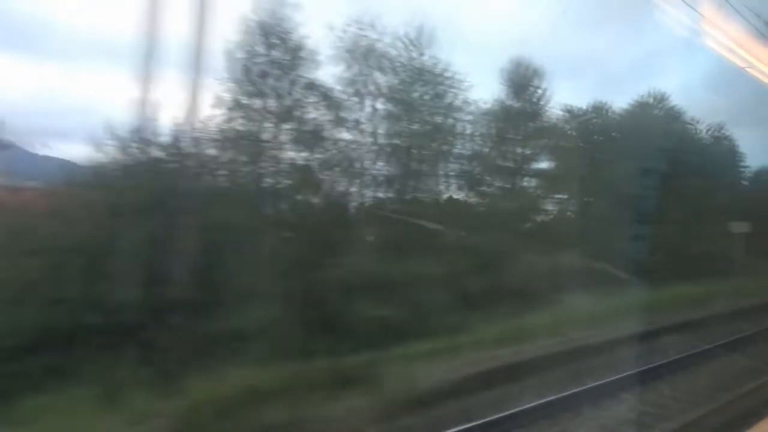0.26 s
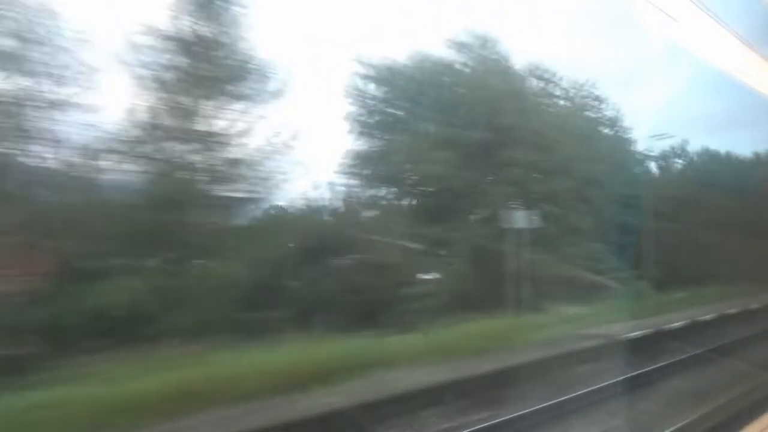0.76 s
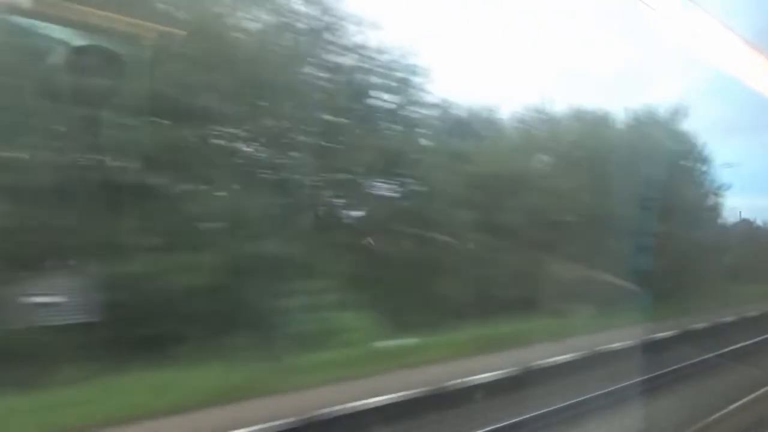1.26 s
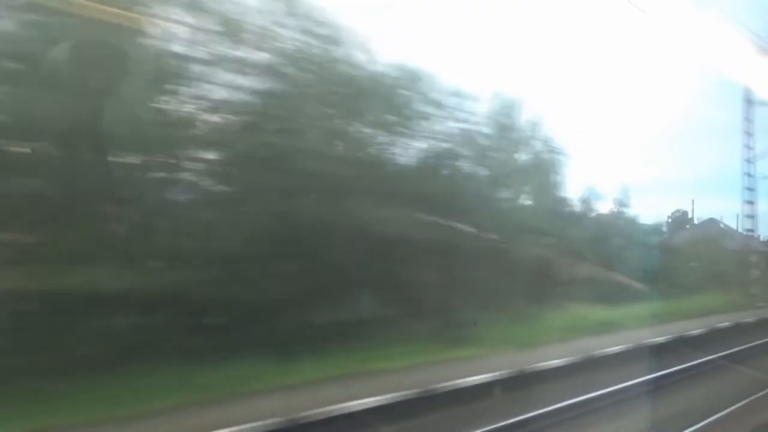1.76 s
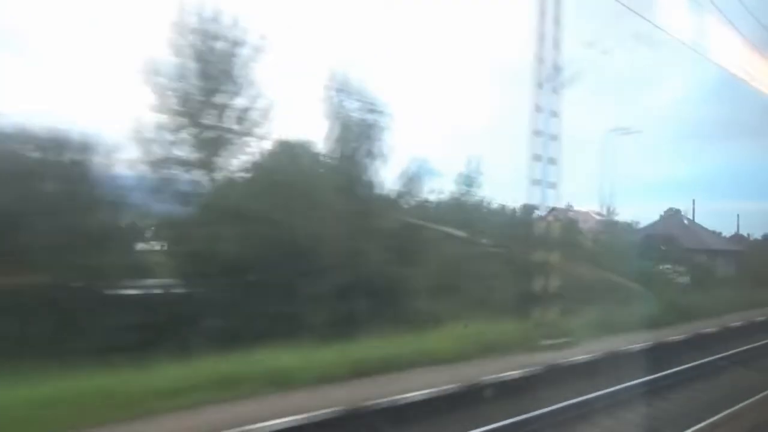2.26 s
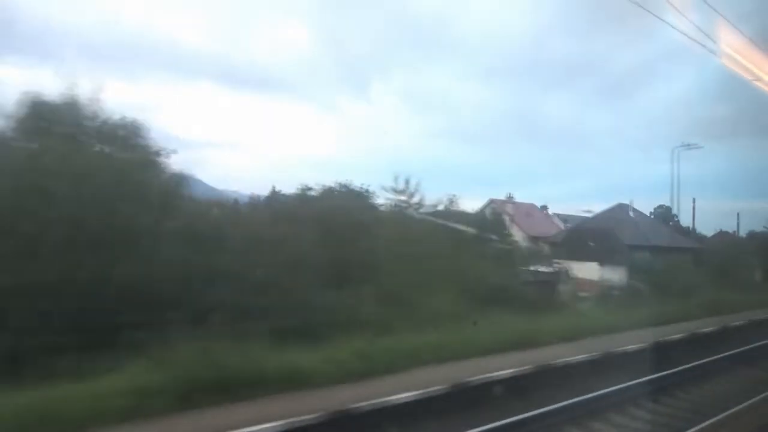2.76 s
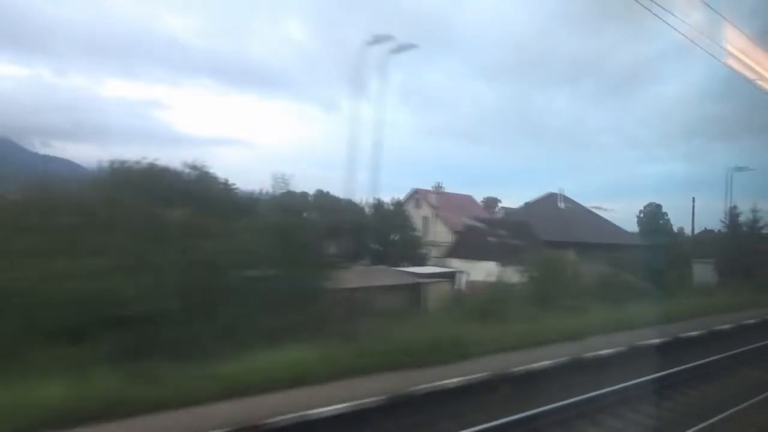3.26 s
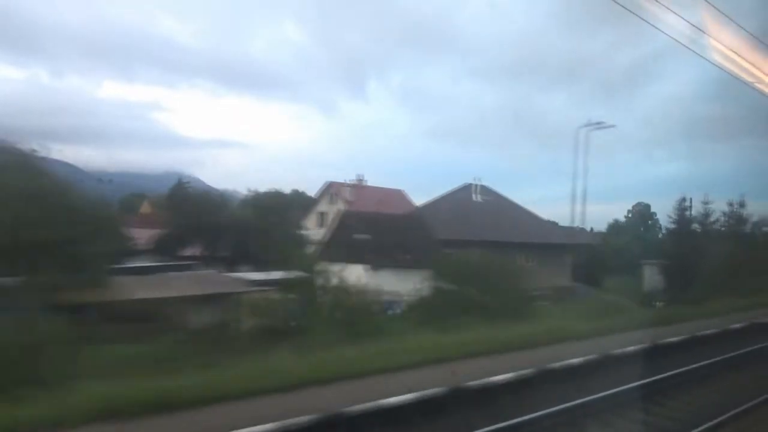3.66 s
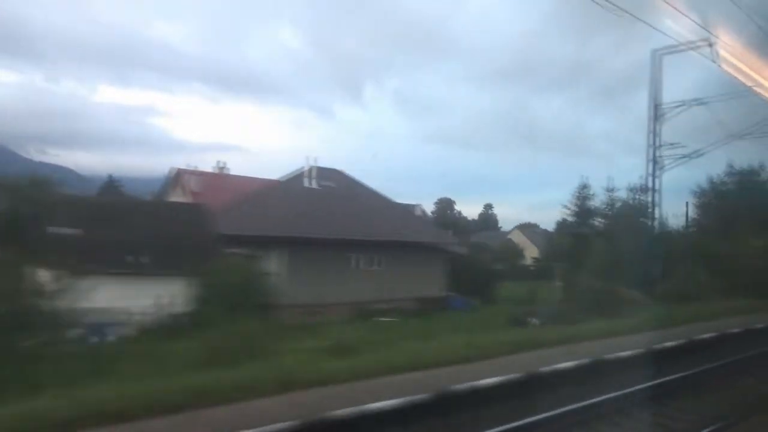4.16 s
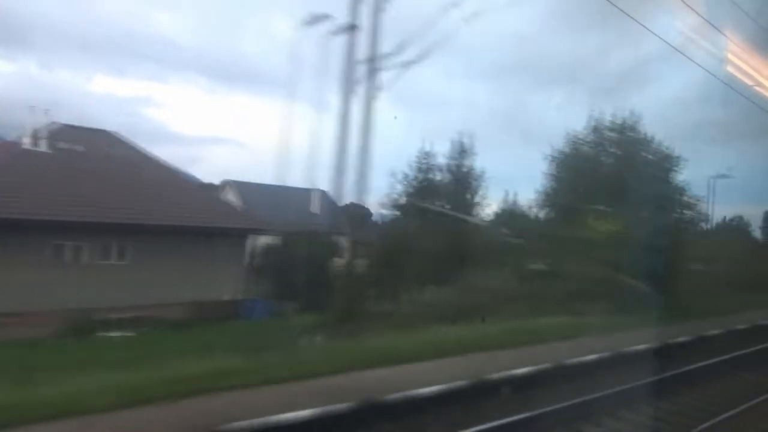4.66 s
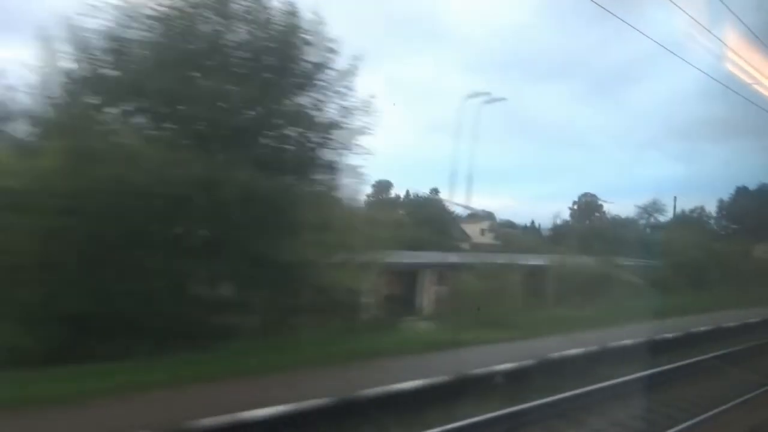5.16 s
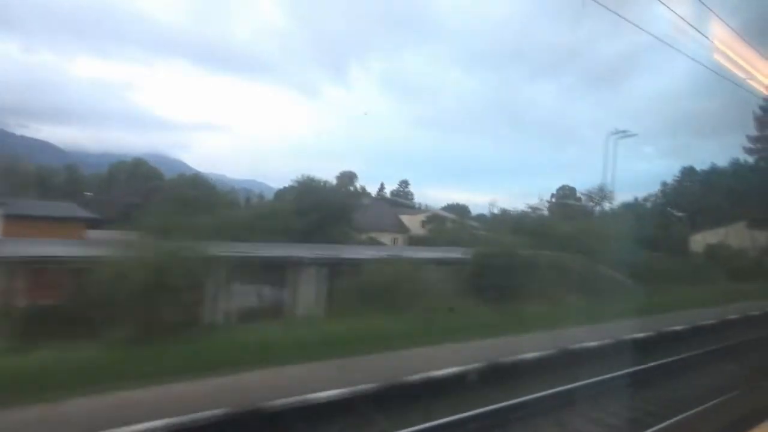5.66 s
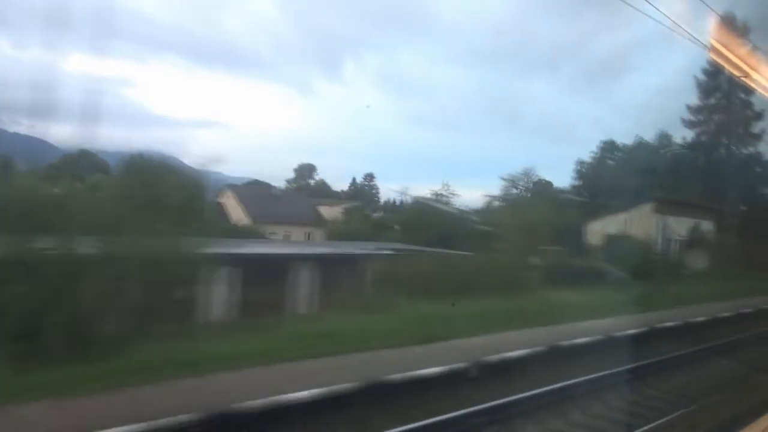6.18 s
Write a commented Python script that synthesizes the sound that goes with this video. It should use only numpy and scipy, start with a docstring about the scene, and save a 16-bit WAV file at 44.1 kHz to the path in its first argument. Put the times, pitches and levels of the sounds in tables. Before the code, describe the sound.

Inside a passenger train at speed, the wheels make a steady low rumble and roar on the rails, with a gently pulsing gear whine and a faint hiss of air. A dull wheel knock comes about a second in, and a quick run of knocks around three seconds, both with small metallic pings. Loose trim buzzes and ticks lightly on and off. The microphone is close, inside the carriage.

```python
"""Rolling noise inside a passenger carriage at speed: wheel and rail roughness comes up through the floor
and fills the modes of the car body, and the wheels knock over rough spots. Two gear drives whine a hair
apart and beat. Loose trim buzzes in spells and ticks; now and then a metal fitting pings. Air hisses past
window and vents. Heard by a close pair of microphone ports whose bass differs in level and phase."""
import sys
import numpy as np
from scipy import signal
from scipy.fft import rfft, irfft
from scipy.io import wavfile
from scipy.ndimage import uniform_filter1d, minimum_filter1d

SR = 44100
rng = np.random.default_rng(int(sys.argv[2]) if len(sys.argv) > 2 else 0)


def master(y):
    """Save y as 16-bit WAV."""
    cut = np.clip(np.atleast_2d(y).T, -1, 1)
    pcm = np.round(cut * 32767)  # scale
    wavfile.write(sys.argv[1], SR, pcm.astype(np.int16))


N = 283122
TIME_S = np.arange(N) / SR
HZ = np.maximum(np.arange(N // 2 + 1) * SR / N, 1)

# Each row: time in seconds, sway level in dB, floor boom level in dB.
BODY_LEVELS = [(0.0, -36, -24), (0.18, -41, -20.5), (0.36, -30.5, -30), (0.46, -50, -19),
               (0.53, -21, -22.5), (0.95, -42, -16), (1.03, -41, -33), (1.11, -35, -17.5),
               (1.59, -35, -26.5), (1.88, -25, -23.5), (1.93, -49.5, -22), (2.13, -50, -23),
               (2.22, -24, -41), (2.31, -40, -22.5), (2.47, -38, -29), (2.54, -24, -15),
               (2.61, -31.5, -27.5), (2.68, -22, -19), (2.76, -30, -24.5), (3.34, -41.5, -14.5),
               (3.48, -35, -19.5), (3.54, -47.5, -27.5), (3.83, -31, -22), (3.88, -33, -21),
               (4.7, -27, -25), (4.83, -42, -14), (4.9, -47, -28.5), (5.06, -23, -19), (5.33, -47, -18.5),
               (5.36, -39, -27), (5.78, -44, -17.5), (5.93, -27, -29), (6.26, -39, -20.5),
               (6.42, -60, -22.5)]
# Each row: time in seconds, level of the second floor mode in dB.
THRUM_LEVELS = [(0.0, -25), (0.07, -22.5), (0.18, -26), (0.93, -25), (0.95, -34.5), (1.14, -17),
                (1.41, -27), (2.32, -29.5), (2.5, -18), (3.0, -37.5), (3.07, -28.5), (3.57, -31),
                (3.68, -22), (4.17, -25), (4.38, -18.5), (4.43, -32), (4.52, -16), (4.58, -26.5),
                (4.67, -18), (4.74, -33), (4.79, -19.5), (4.86, -39), (4.95, -25.5), (6.22, -25.5),
                (6.33, -17.5), (6.42, -35)]
# Each row: frequency in Hz, relative density in dB.
SWAY_SPECTRUM = [(15, -41), (25, -26), (35, -14.5), (48, -17), (60, -25), (90, -40)]
# Floor modes. Each row: frequency in Hz, width in Hz, relative level in dB.
BOOM_MODES = [(60.9, 18.7, -2), (79, 59, -27)]
THRUM_MODES = [(103.5, 13.6, 0)]


def car_body():
    """Wheel and rail roughness sways the body and drives the floor modes; each part swells on its own."""
    sway_db, boom_db = in_time(BODY_LEVELS)
    thrum_db, = in_time(THRUM_LEVELS)
    sway = amp(sway_db) * steadied(noise(colour(SWAY_SPECTRUM)), window_s=0.25)
    boom = amp(boom_db) * steadied(noise(modal(BOOM_MODES)), window_s=0.073)
    thrum = amp(thrum_db) * steadied(noise(modal(THRUM_MODES)), window_s=0.08)
    return sway + boom + thrum


# Each row: time in seconds, bogie rumble level in dB, roar level in dB before its lift.
TRACK_LEVELS = [(0.0, -19.5, -40), (0.3, -22.5, -39.5), (0.7, -20, -40.5), (1.15, -21.5, -40.5),
                (1.5, -22, -39), (1.8, -20.5, -38.5), (2.3, -21.5, -39), (2.55, -21, -38),
                (2.95, -20.5, -39), (3.2, -16, -39.5), (3.5, -22.5, -39.5), (3.85, -21, -40),
                (4.5, -21, -39), (5.0, -20.5, -39.5), (5.2, -20.5, -39.5), (5.5, -21, -39.5),
                (6.42, -20, -38.5)]
# Random swells and dips of the 400-480 Hz drone noise. Each row: time in seconds, level in dB.
DRONE_SWELLS = [(0.0, -17.5), (0.27, -28.5), (0.3, -23), (1.52, -21), (1.55, -33.5), (1.63, -16),
                (1.64, -27.5), (1.79, -24), (1.82, -17.5), (1.91, -24.5), (1.97, -19), (2.25, -25),
                (2.95, -21.5), (3.5, -26.5), (3.54, -17), (3.65, -26), (3.68, -23.5), (3.97, -24.5),
                (4.0, -17), (4.04, -28), (4.11, -19.5), (4.17, -30), (4.29, -19), (4.54, -25), (5.47, -21),
                (5.52, -29.5), (5.58, -21), (5.92, -23), (6.24, -18.5), (6.42, -28)]
# Each row: frequency in Hz, width in Hz, relative level in dB.
RUMBLE_MODES = [(119, 15.5, -3.5), (149.6, 32.7, -1.5), (186, 108, -7), (227.4, 34, -5.5), (280, 27, -13.5),
                (307.5, 41, -10.5), (354, 73, -11.5)]
DRONE_MODES = [(409.6, 21.7, -4), (436.4, 19, -1), (457.3, 23.7, -2), (476, 28, -8)]
# Each row: frequency in Hz, relative density in dB.
FILL_SPECTRUM = [(40, -23), (70, 2.5), (130, -4.5), (250, -7.5), (380, -10), (480, -21), (600, -59)]
ROAR_SPECTRUM = [(300, -10), (500, -1), (575, -7), (632, -5.5), (740, -9), (873, -13), (1290, -15.5),
                 (1560, -21.5), (1840, -25.5), (2160, -24.5), (2900, -31.5), (4000, -42), (5200, -52)]


def rolling(fill_db=-29.5, roar_lift_db=9.5):
    """Roughness shakes the bogie in its modes, over a wavering drone and a broad roar."""
    rumble_db, roar_db = in_time(TRACK_LEVELS)
    swell_db, = in_time(DRONE_SWELLS)
    rumble = amp(rumble_db) * steadied(noise(modal(RUMBLE_MODES)), window_s=0.19)
    drone = amp(swell_db) * steadied(noise(modal(DRONE_MODES)), window_s=0.2)
    fill = amp(fill_db) * noise(colour(FILL_SPECTRUM))   # between the modes
    roar = amp(roar_db + roar_lift_db) * noise(colour(ROAR_SPECTRUM))
    return rumble + drone + fill + roar


# Each row: start in seconds, level in dB.
KNOCKS = [(1.09, -25), (3.035, -19.5), (3.1, -20.5), (3.16, -22), (3.195, -18), (3.212, -23.5),
          (3.245, -27), (3.285, -24.5), (3.32, -34)]
# Each row: frequency in Hz, relative density in dB.
KNOCK_SPECTRUM = [(80, -29), (150, -8.5), (220, 0.5), (300, 0), (420, -5), (650, -11.5), (900, -19),
                  (1400, -29), (2100, -31.5), (3000, -37.5), (4500, -55)]


def wheel_knocks():
    """Wheels hit rough spots in the rail: dull bursts of noise."""
    return blows(KNOCKS, rise_s=0.0062, t60_s=0.27) * noise(colour(KNOCK_SPECTRUM))


# Each row: time in seconds, tooth-mesh level in dB.
MESH_LEVELS = [(0, -36), (.45, -41.5), (.9, -38.5), (1.3, -38.5), (1.8, -36.5), (2.2, -36.5), (2.6, -36.5),
               (3.1, -38), (3.5, -40.5), (3.95, -39), (4.4, -38.5), (4.8, -39), (5.2, -39), (5.6, -38),
               (6.0, -39), (6.42, -34.5)]
# Slip between the drives. Each row: time in seconds, beat rate in Hz.
BEAT_RATES = [(0, 1.1), (2.9, 1.1), (3.2, 1.2), (6.42, 1.2)]
# Each row: frequency in Hz, level in dB.
WHINES = [(1578, -64), (1639, -66), (2422, -63), (4601, -78), (4856, -74), (5186, -77), (5600, -79),
          (5900, -74), (5798, -76), (7285, -80), (9200, -82), (9399, -80)]


def gear_drives(mesh_hz=789.02, first_db=0.5, second_db=-4, start_cycles=0.072):
    """Two nearly equal tooth-mesh tones beat; faint steady whines lie above."""
    mesh_db, = in_time(MESH_LEVELS)
    beat_hz, = in_time(BEAT_RATES)
    slip_cycles = start_cycles + np.cumsum(beat_hz) / SR
    first = amp(first_db) * np.cos(2 * np.pi * mesh_hz * TIME_S)
    second = amp(second_db) * np.cos(2 * np.pi * (mesh_hz * TIME_S + slip_cycles))
    whines = sum(amp(db) * np.sin(2 * np.pi * hz * TIME_S) for hz, db in WHINES)
    return np.sqrt(2) * (amp(mesh_db) * (first + second) + whines)


# Each row: start in seconds, level in dB.
PINGS = [(1.081, -32), (1.101, -27), (1.123, -37), (1.222, -32), (1.257, -32), (1.298, -36), (3.104, -38),
         (3.116, -38), (3.13, -36), (3.146, -25.5), (3.175, -35), (3.186, -33), (3.193, -33), (3.203, -29),
         (3.24, -37), (3.33, -36)]
# Each row: frequency in Hz, relative level in dB, delay in seconds.
FITTING_MODES = [(2115, 1, .006), (2330, -16, .003), (2560, -8, 0.0024), (2890, -12, 0.0035),
                 (3240, -16, 0.0039)]


def fitting_pings(rise_s=0.004, t60_s=0.035, detune=0.01, scatter_db=2.0):
    """A jolted metal fitting rings in its modes, the lowest last; pitch and level vary by blow."""
    out, t = np.zeros(N), np.arange(SR // 4) / SR
    attack = np.minimum(t / rise_s, 1)
    for start_s, ping_db in PINGS:
        for hz, mode_db, delay_s in FITTING_MODES:
            db = ping_db + mode_db + rng.normal(0, scatter_db)
            ring = np.sin(2 * np.pi * hz * rng.normal(1, detune) * t)
            at = round((start_s + delay_s) * SR)
            out[at:at + len(t)] += attack * amp(db - 60 * t / t60_s) * ring
    return out


# Each row: start in seconds, length before the fall in seconds, level in dB, brightness in dB.
BUZZ_SPELLS = [(.13, 0.13, -59, -5), (.69, 0.082, -52.5, 11), (0.858, 0.12, -62, 3), (1.08, .04, -52, 3),
               (1.135, 0.082, -51, -1), (1.41, 0.05, -52, -1), (1.525, .04, -62, -3),
               (2.99, 0.22, -53.5, 3), (3.136, 0.15, -53, -1), (3.285, 0.15, -50.5, 9),
               (3.46, 0.073, -50, 4), (3.823, 0.088, -51.5, 8), (4.82, 0.051, -51.5, 0),
               (5.03, .06, -55, 6), (5.142, 0.23, -51, 11), (5.65, 0.13, -52.5, 6), (5.8, 0.21, -56.5, 7),
               (6.084, 0.14, -49.5, 7), (6.325, 0.079, -49.5, 5)]
# Panel motions that close the gap. Each row: frequency in Hz, width in Hz, relative level in dB.
PANEL_MODES = [(58.8, 4.6, -2.5), (53, 4.4, -1.5)]


def buzz_force(rest_db=-58, rise_s=0.035, fall_s=0.04, settle_s=0.0091):
    """Trim presses on its frame in spells, harder at each outward swing. Rows: dull, bright."""
    swing, = noise(modal(PANEL_MODES), channels=1)
    touches = 1.0 * (np.diff(np.sign(swing), prepend=0) > 0)
    pulses = uniform_filter1d(touches, 90)   # 2 ms wide
    pole = np.exp(-1 / (settle_s * SR))
    contact = unit_rms(signal.lfilter([1], [1, -pole], pulses))
    power = amp(rest_db) ** 2
    for start_s, length_s, db, bright_db in BUZZ_SPELLS:
        end_s = start_s + length_s
        corners_s = [start_s, start_s + min(rise_s, length_s), end_s, end_s + fall_s]
        spell = np.interp(TIME_S, corners_s, [0, 1, 1, 0])
        power = power + (amp(tilted(db, bright_db)) * spell) ** 2
    return np.sqrt(power) * unit_rms(1 + contact)


# Each row: start in seconds, level in dB, brightness in dB, pitch in Hz (arbitrary for faint ticks).
TICKS = [(0.1794, -55, -3, 4780), (0.7063, -57, 3, 9090), (.893, -56, 0, 7840), (0.9403, -51, 9, 7800),
         (1.0959, -47, 4, 8610), (1.1717, -52, 0, 9390), (1.2994, -52, -2, 4650), (1.4194, -53, -2, 5340),
         (1.4586, -55, 0, 7280), (1.539, -49, -12, 4650), (1.562, -56, -12, 4650), (1.664, -50, -1, 6980),
         (1.7994, -54, 0, 5430), (1.8694, -58, 0, 4650), (3.0424, -56, -1, 5900), (3.1632, -49, 0, 6670),
         (3.198, -52, 0, 6330), (3.218, -52, -5, 4650), (3.277, -54, 0, 5300), (3.3613, -54, 2, 8610),
         (3.6441, -52, 0, 9470), (3.8796, -51, 0, 8350), (4.2344, -52, -3, 5340), (4.4994, -61, -1, 7490),
         (4.9534, -54, 0, 9720), (5.0786, -54, 2, 9690), (5.1731, -52, 3, 5300), (5.19, -52, 0, 6160),
         (5.206, -52, 4, 9730), (5.257, -52, 4, 8610), (5.7219, -51, 3, 7150), (5.9015, -58, 2, 8270),
         (6.1374, -58, 3, 9780)]


def tick_force():
    """Single touches of the trim. Rows: dull, bright."""
    touches = [(start_s, tilted(db, bright_db)) for start_s, db, bright_db, _ in TICKS]
    return blows(touches, rise_s=0.001, t60_s=0.048)


def tick_rings(ring_db=-5, rise_s=0.003, t60_s=0.11, pair_ratio=1.03):
    """Each tick gets a short high ring: a close pair of decaying tones."""
    out, t = np.zeros(N + SR), np.arange(SR // 5) / SR
    envelope = np.minimum(t / rise_s, 1) * amp(ring_db - 60 * t / t60_s)
    for start_s, db, _, hz in TICKS:
        pair = sum(np.sin(2 * np.pi * (f * t + rng.random())) for f in (hz, hz * pair_ratio))
        at = round(start_s * SR)
        out[at:at + len(t)] += amp(db) * envelope * pair
    return out[:N]


# Each row: frequency in Hz, relative density in dB.
GRIT_SPECTRUM = [(1800, -24.5), (3000, 7), (4800, 5), (6500, 1.5), (8500, 1), (10200, -7), (11800, -13),
                 (15000, -45)]
# Each row: frequency in Hz, width in Hz, relative level in dB.
TRIM_MODES = [(4650, 110, -3.5), (5240, 82, -3), (5860, 70, -3), (6330, 80, -0.5), (6670, 43, -6),
              (7250, 80, -5.5), (8000, 97, -9.5), (8550, 53, -6), (9260, 31, -5), (9720, 56, -3)]


def trim_rub(force, modes_db=9, split_hz=6500):
    """Trim rubs on its frame: grit coloured by its modes, a dull and a bright band under separate force."""
    resonance = np.sqrt(1 + (amp(modes_db) * modal(TRIM_MODES)) ** 2)
    grit = noise(colour(GRIT_SPECTRUM) * resonance)
    dull = irfft(rfft(grit) / (1 + (HZ / split_hz) ** 4), N)
    dull_force, bright_force = force
    return dull_force * dull + bright_force * (grit - dull)


# Each row: frequency in Hz, relative density in dB.
HISS_SPECTRUM = [(1500, -37), (2500, -11.5), (3400, -12), (5450, -16), (6650, -19.5), (9400, -20.5),
                 (11800, -29.5), (14600, -28.5), (16500, -46)]


def air_hiss(level_db=-53.5):
    """Air streams steadily past window and vents."""
    return amp(level_db) * noise(colour(HISS_SPECTRUM))


def amp(db):
    """dB to gain."""
    return 10 ** (np.asarray(db) / 20)


def unit_rms(x):
    """Scale to rms 1."""
    return x / np.sqrt(np.mean(x ** 2) + 1e-20)


def tilted(db, bright_db):
    """Dull and bright levels in dB, bright_db apart."""
    return db + np.array([[-0.5], [0.5]]) * bright_db


def in_time(rows):
    """Each column after the first as a curve over time."""
    times_s, *columns = np.transpose(rows)
    return [np.interp(TIME_S, times_s, column) for column in columns]


def over_hz(rows):
    """Each column after the first as a curve over frequency."""
    hz, *columns = np.transpose(rows)
    return [np.interp(np.log(HZ), np.log(hz), column) for column in columns]


def colour(spectrum):
    """Gain of a spectrum table, zero beyond its ends."""
    return amp(over_hz(spectrum)[0]) * (HZ > spectrum[0][0]) * (HZ < spectrum[-1][0])


def modal(modes):
    """Gain of unrelated modes, each a resonance applied twice; powers add."""
    power = 0
    for hz, width_hz, db in modes:
        offset = (HZ ** 2 - hz ** 2) / (HZ * width_hz)
        power = power + (amp(db) / (1 + offset ** 2)) ** 2
    return np.sqrt(power)


def noise(gain, channels=2):
    """Independent noises of one colour, rms 1; by default a common and a diffuse row."""
    return unit_rms(irfft(rfft(rng.standard_normal((channels, N))) * gain, N))


def steadied(x, window_s):
    """A steadily driven mode wanders less than free noise: slow swells are partly levelled."""
    power = uniform_filter1d(x[0] ** 2, int(window_s * SR))
    return unit_rms(x / np.sqrt(power + 0.76))


def blows(events, rise_s, t60_s):
    """Force of a series of blows: linear rise, exponential decay."""
    force = 0
    for start_s, db in events:
        attack = np.clip((TIME_S - start_s) / rise_s, 0, 1)
        decay_s = np.maximum(TIME_S - start_s - rise_s, 0)
        force = force + attack * amp(db - 60 * decay_s / t60_s)
    return force


def scene():
    """Row 0 is common to both ports, row 1 diffuse; tones are common only."""
    running = car_body() + rolling() + wheel_knocks()
    noises = running + trim_rub(buzz_force() + tick_force()) + air_hiss()
    tones = gear_drives() + fitting_pings() + tick_rings()
    return noises + tones * [[1], [0]]


# Each row: frequency in Hz, coherence from 0 to 1, right lead in radians, left minus right in dB.
MIC_PORTS = [(30, .995, .67, -3.3), (90, .995, .82, -4.1), (160, .98, .9, -2.5), (250, .85, 1.15, -.5),
             (400, .98, .98, .4), (640, .75, 1.05, -.5), (800, .78, 1.0, .8), (1100, .7, .66, -1),
             (1600, .55, .6, .3), (2000, .71, .05, -.3), (3200, .66, .22, -.6), (6000, .7, .06, .1),
             (8000, .77, .08, 0), (9200, .93, .05, 0), (9800, .995, 0, 0), (16000, 1, 0, 0)]


def record(dry, fade_samples=64, ceiling=0.7, hold_s=0.006, cutoff_hz=15700):
    """Two ports mix common and diffuse sound, unequal in phase and level; then limiter and low-pass."""
    coherence, lead_rad, balance_db = over_hz(MIC_PORTS)
    side = np.array([[1], [-1]])   # left, right
    from_edge = np.minimum(np.arange(N), np.arange(N)[::-1])
    common, diffuse = rfft(dry * np.minimum(from_edge / fade_samples, 1))
    spectra = np.sqrt((1 + coherence) / 2) * common + side * np.sqrt((1 - coherence) / 2) * diffuse
    phase_shift = np.exp(-1j * side * lead_rad / 2) / np.cos(lead_rad / 2)
    pair = irfft(spectra * amp(side * balance_db / 2) * phase_shift, N)
    hold = int(hold_s * SR)
    allowed = np.minimum(ceiling / (np.abs(pair).max(axis=0) + 1e-9), 1)
    held = minimum_filter1d(allowed, 2 * hold)
    gain = uniform_filter1d(uniform_filter1d(held, hold), hold)
    lowpass = signal.ellip(12, 0.5, 80, cutoff_hz, fs=SR, output="sos")
    return signal.sosfilt(lowpass, pair * gain)


dry = scene()
out = record(dry)
master(out)
```